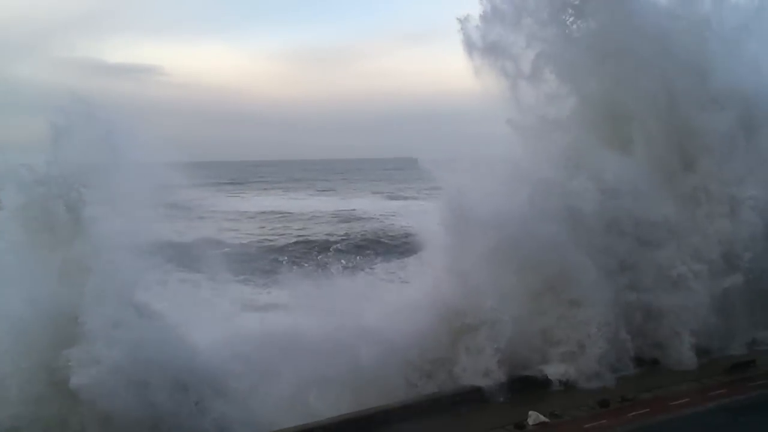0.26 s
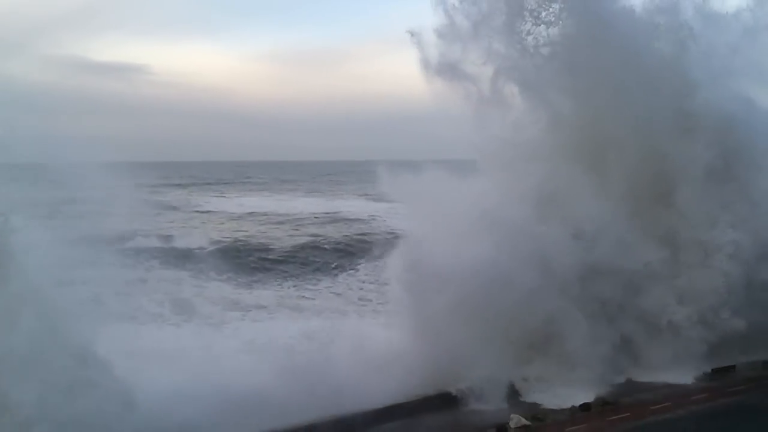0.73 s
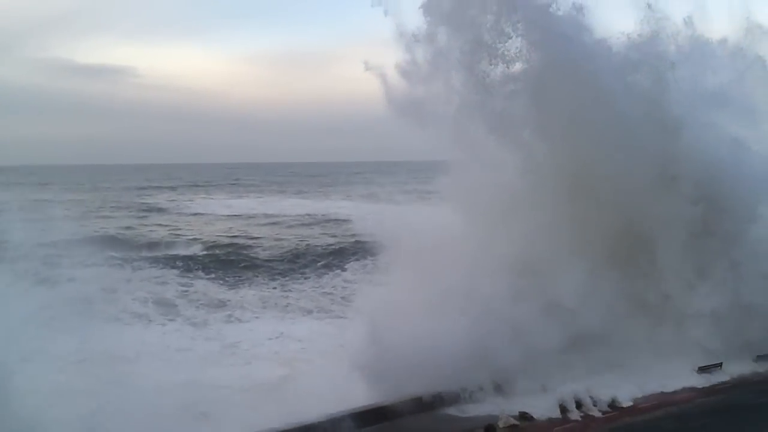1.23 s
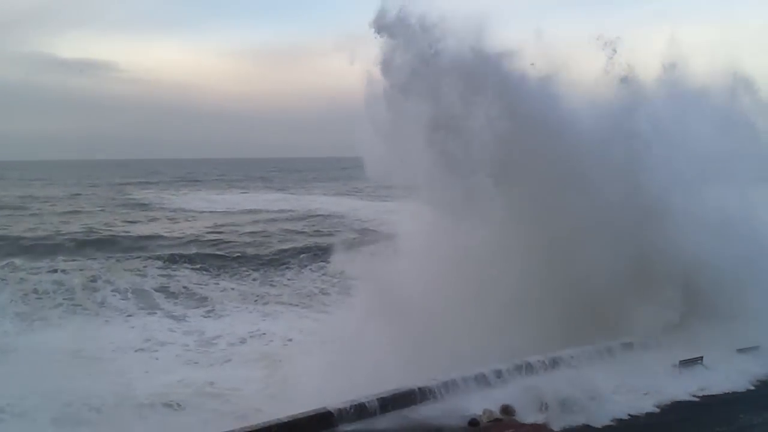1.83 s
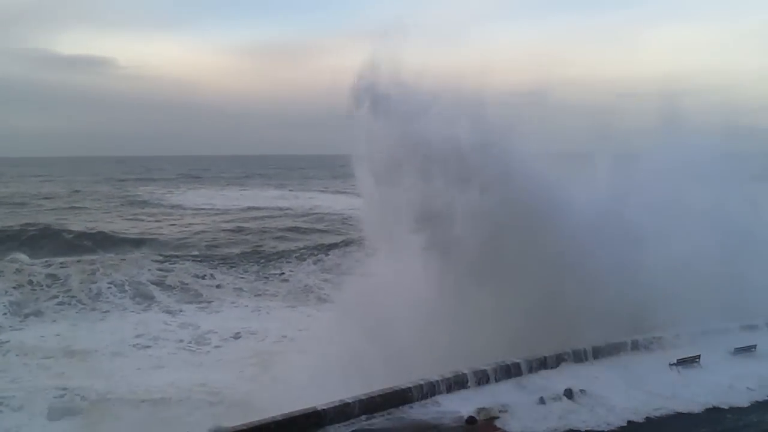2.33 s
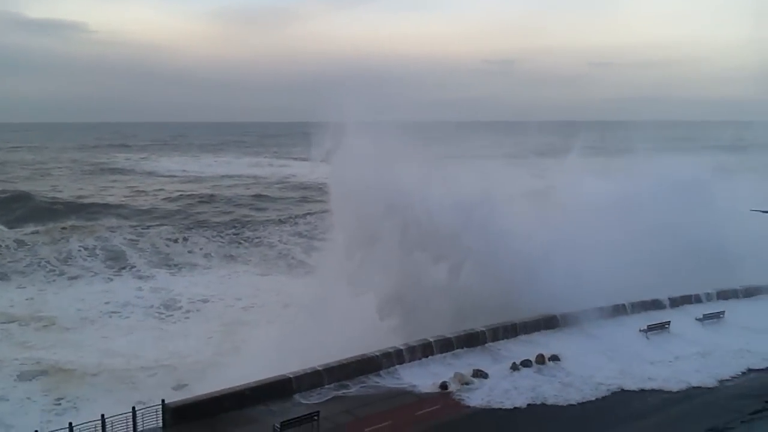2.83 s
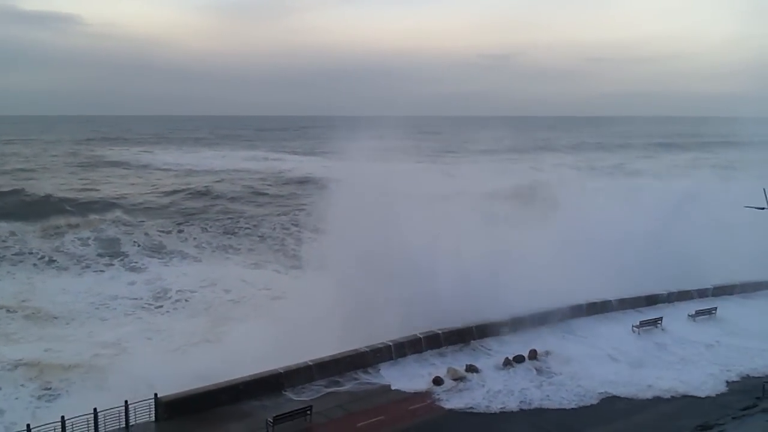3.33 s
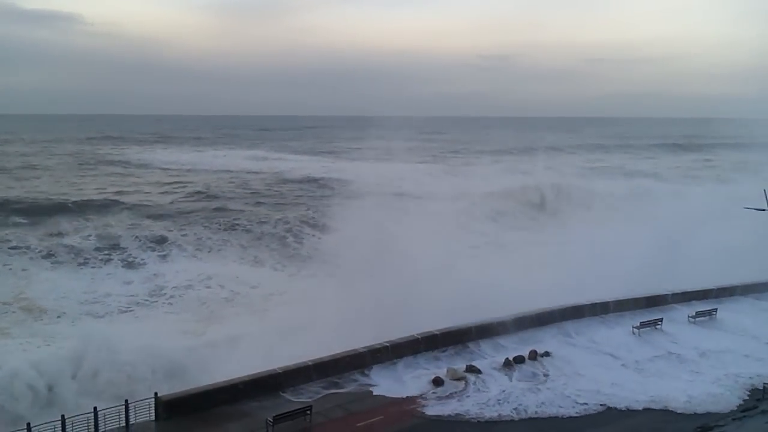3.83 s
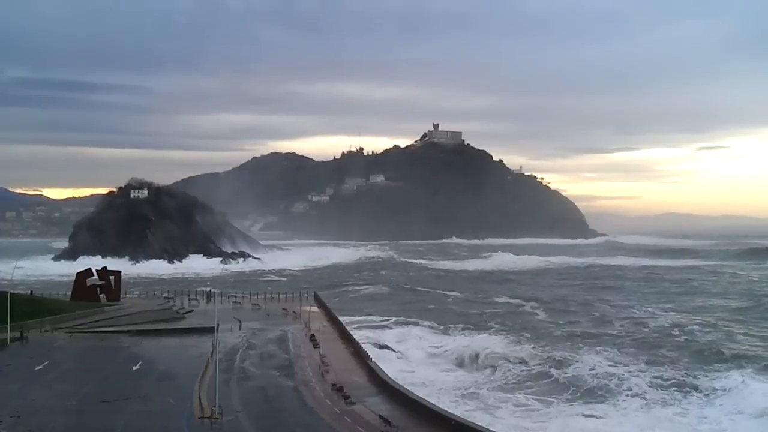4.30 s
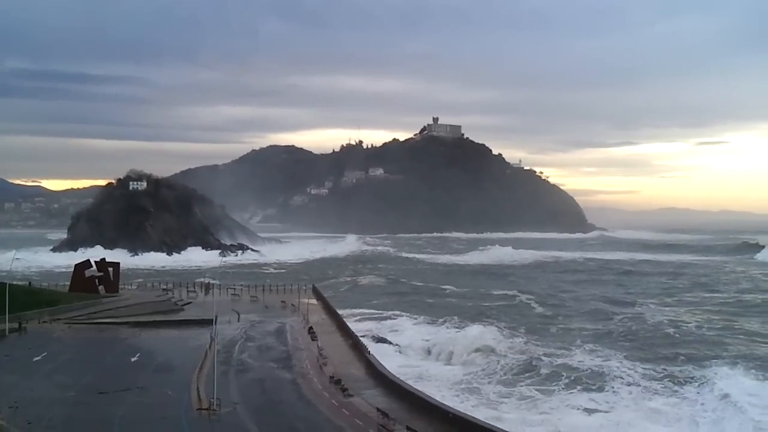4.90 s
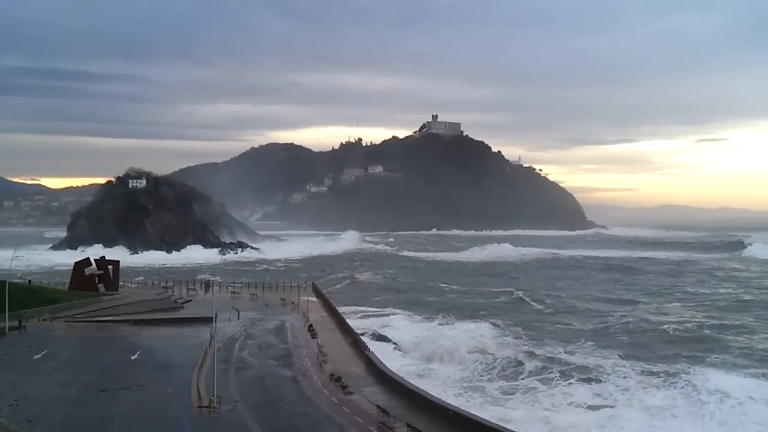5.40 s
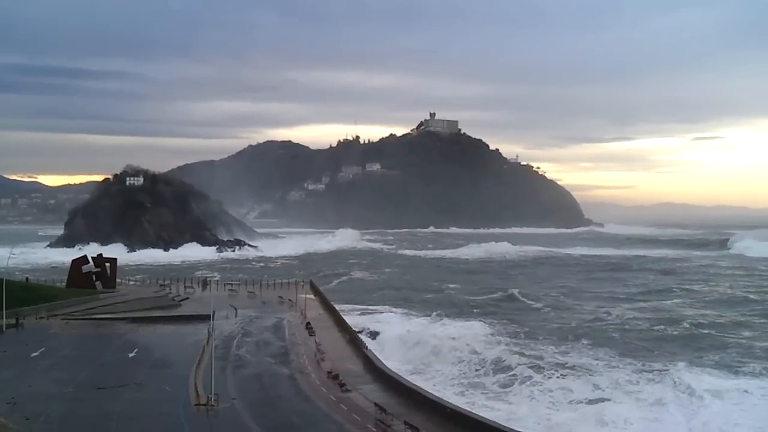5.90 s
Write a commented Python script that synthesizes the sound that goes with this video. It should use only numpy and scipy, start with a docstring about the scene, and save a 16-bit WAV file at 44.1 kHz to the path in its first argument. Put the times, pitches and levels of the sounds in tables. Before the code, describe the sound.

A storm wave booms and bursts on a concrete sea wall, hissing spray rains down and fades, then brief silence and a duller steady surf roar.

```python
"""Water booms and bursts on a concrete sea wall in a storm, spray rains back and foam washes over the promenade.
After a short silence the surf is heard from further along the front, duller and steadier.
Water is random drop impacts coloured by a spectrum, its boom and the wind are lumpy low noise, and
low thumps are short shoves of pressure or ragged rumbles.
One small microphone stands in the wind at both places; both channels carry the same signal."""
import sys
import numpy as np
from scipy import signal
from scipy.fft import rfft, irfft, next_fast_len
from scipy.io import wavfile
from scipy.ndimage import uniform_filter1d

SR = 44100
rng = np.random.default_rng(int(sys.argv[2]) if len(sys.argv) > 2 else 0)


def int16_out(signal):
    """Quantize to a 16-bit WAV file."""
    q = np.round(np.clip(np.atleast_2d(signal).T, -1, 1) * 32767)
    wavfile.write(sys.argv[1], SR, q.astype(np.int16))


N = 271215  # samples

# The silent break between the two places: its start and its end in seconds.
WALL_END_S, FRONT_START_S = (4.0043, 4.1715)
CUTOFF_HZ = 11250

# Spectra of the wind and of each kind of water. Each row: frequency in Hz, relative density in dB per Hz.
WALL_WIND = [(8, -2.5), (20, 7), (45, -4.5), (65, -5), (100, -10), (250, -34.5)]
FRONT_WIND = [(8, -2), (20, -1.5), (45, -7), (62, -6), (85, -7), (130, -12), (200, -17.5), (400, -45),
              (1000, -49)]
BOOM = [(35, -8.5), (55, 1.5), (85, 1), (135, -0.5), (190, -6), (260, -13), (500, -16.5)]
CHURN = [(130, -6), (190, -3.5), (250, 1), (320, -7), (400, 2), (530, -1), (700, -6), (900, -7.5),
         (1200, -12.5), (1700, -21.5), (3500, -48)]
SEA_CHURN = [(130, -6.5), (190, -3.5), (250, 1.5), (325, -3.5), (410, -2.5), (520, -1.5), (700, -5.5),
             (900, -6.5), (1200, -12), (1700, -20.5), (3500, -49)]
BACKWASH = [(140, -19), (195, 0.5), (250, -4), (325, -0.5), (400, -17), (700, -32.5)]
SPLATTER = [(700, -16.5), (1300, -3.5), (1800, 0), (2400, -2), (3000, -6), (4000, -1.5), (4700, -6.5),
            (5600, -7), (8000, -46)]
SPRAY = [(3000, -10.5), (4600, -7), (5300, -1), (6300, 0), (7800, 0), (8800, -2.5), (9700, -7.5),
         (10400, -10), (10900, -22), (11400, -63.5)]
TOP_HISS = [(4500, -19.5), (6500, 7.5), (8200, 7), (9200, -9), (10300, 8), (11000, -0.5), (11400, -37)]
WASH = [(700, -32), (1200, 0), (1550, 1.5), (1900, 1.5), (2400, -3), (3000, -5), (4000, -1), (4700, -3),
        (5600, -8.5), (8000, -44)]
SETTLED_SPRAY = [(3000, -20.5), (4600, -3), (5300, 0.5), (6300, 2.5), (8200, 3), (8700, -4.5), (9500, -2),
                 (10100, -7), (10600, -49)]
ROAR = [(110, -19), (190, -7.5), (255, 1), (370, -4.5), (490, -3), (720, -6.5), (1100, -7.5), (1400, -10.5),
        (1680, -5.5), (2000, -14.5), (2600, -25), (4000, -54)]
FOAM = [(1500, -17), (2200, -7), (3000, -10), (3950, -4.5), (4500, -6), (5200, -2.5), (5700, -12),
        (6500, -11.5), (7700, -13), (8600, -15.5), (9500, -16.5), (10100, -22), (10700, -37.5)]

# Wind at each place, and how fast it eases at the wall.
WALL_WIND_DB, WALL_WIND_EASES_DB_PER_S = -30, 0.6
FRONT_WIND_DB = -31.5
# Gusts. Each row: time of the peak in seconds, half length (Gaussian sigma) in seconds, dB above the steady wind.
GUSTS = [(0.18, 0.079, 1), (0.75, 0.21, 5), (1.38, 0.05, 2.5), (1.85, 0.085, 1), (5.056, 0.034, 0.5),
         (5.85, 0.13, 2)]

# Low thumps, as water lands or an eddy hits the microphone.
# Each row: time of the peak in seconds, centre in Hz, level at the peak in dB, half length (sigma) in seconds.
THUMPS = [(0.074, 46, -29.5, .025), (0.085, 83, -30, 0.028), (0.24, 19, -25.5, .06), (0.44, 31, -29, .025),
          (0.441, 120, -30.5, 0.0075), (0.538, 39, -29, .018), (0.545, 140, -26.5, 0.0082),
          (0.576, 15, -26, .04), (0.635, 60, -24, .013), (0.672, 105, -26, .009), (0.705, 36, -21.5, 0.026),
          (0.76, 123, -29.5, .01), (0.798, 100, -27, .01), (0.821, 35, -27, 0.026),
          (0.901, 56, -21.5, 0.018), (0.977, 88, -26.5, 0.015), (1.141, 48, -22.5, 0.027),
          (1.195, 79, -28, 0.015), (1.331, 96, -24, .009), (1.362, 40, -22, .03), (1.458, 75, -23.5, .013),
          (1.593, 66, -24.5, 0.021), (1.827, 85, -25.5, .014), (1.965, 80, -25.5, 0.019),
          (2.069, 40, -28, .028), (2.222, 68, -25, .012), (2.326, 49, -28, .016), (2.63, 43, -29, .02),
          (2.75, 44, -30, 0.018), (2.831, 61, -24.5, .013), (2.965, 59, -28.5, 0.017),
          (3.161, 61, -33, .02), (3.32, 73, -31, .02), (3.439, 71, -32.5, 0.02), (4.288, 113, -32.5, 0.017),
          (4.444, 44, -32, .016), (4.612, 28, -30, .018), (4.776, 49, -31, 0.027), (5.132, 22, -26.5, .018),
          (5.323, 70, -31.5, .011), (5.411, 20, -28, .024), (5.556, 73, -32, .012), (5.678, 69, -32, 0.014),
          (5.763, 41, -30.5, .03), (5.895, 34, -27, .024), (5.978, 76, -30, .012)]
# A thump whose half length spans this many cycles is wholly ragged noise, spread this far around its pitch.
THUMP_RAGGED_CYCLES, THUMP_WIDTH_OCTAVES = 2.5, 0.65

# Open surf: a steady roar, and foam that slowly dies down.
ROAR_DB, FOAM_DB, FOAM_FADE_DB_PER_S = -38, -44.5, 1.53

# The sea at the wall: steady boom and churn, and the churning that lingers between surges.
SEA_BOOM_DB, SEA_CHURN_DB, SPENT_CHURN_DB = -38, -37.5, -54
# The last wave still falls, the next hits the wall and comes down in three sheets, lesser ones run in after it.
# Each row: start in seconds, build-up in seconds, length in seconds, boom in dB, churn in dB, splatter in dB;
# the levels are those before the sag, the drain and each layer's trim.
SURGES = [(0.018, 0.045, 0.42, -44, -50, -36.5), (0.4, 0.032, 0.54, -35, -35.5, -39),
          (0.801, 0.08, 0.69, -31.5, -33.5, -31), (1.02, .05, 0.3, -35, -43, -35.5),
          (1.525, 0.041, 0.31, -37, -36.5, -32.5), (3.124, 0.06, 0.78, -46, -43.5, -38),
          (3.33, 0.059, 0.54, -49, -42.5, -56), (3.76, 0.066, 0.44, -53, -50, -38.5)]
# Every surge sags from its start, then drains away, the low voices last.
SURGE_SAG_DB_PER_S = 4
BOOM_DRAIN_DB_PER_S, CHURN_DRAIN_DB_PER_S, SPLATTER_DRAIN_DB_PER_S = 17.5, 14.5, 35.5
# The spent wave pours back off the wall, a hollow gurgle.
BACKWASH_S, BACKWASH_BUILD_S, BACKWASH_DB = 2.43, .3, -44.5

# How much spray is coming down. Each row: time in seconds, level in dB before each layer's trim.
SPRAY_FALL = [(0.0, -39), (0.29, -35), (0.8, -30.5), (1.11, -28), (1.5, -29), (1.78, -28.5), (1.98, -30.5),
              (2.05, -32.5), (3.12, -40), (3.51, -38.5), (4.0, -41)]
# Splatter and the spray's bright top hiss: level before trim at the usual spray, and the share of the
# spray's dB swing each follows.
SPRAY_USUAL_DB = -34
SPLATTER_DB, SPLATTER_FOLLOWS = -37, 0.46
TOP_HISS_DB, TOP_HISS_FOLLOWS = -58, 2.7
# The spray settles and the next surge runs in. Each row: time in seconds, power share of wash from 0 to 1.
SETTLING = [(0, 0.37), (1, 0.02), (2.7, 0.18), (3.3, 0.72), (4.0, 1)]

# Resonances of the microphone port, facing the wave. Each row: centre in Hz, width in Hz, gain in dB.
PORT = [(2070, 570, 7), (3840, 640, 1.3), (5570, 690, 5), (6240, 200, -2)]
# A narrow band of the hiss rises and hollows as the microphone turns. Each row: time in seconds, gain in dB.
TURNING = [(0, -1), (.8, 1.5), (1.4, 2.5), (1.9, 0.5), (2.35, -5), (3.0, -4.5), (3.3, 0.5), (4.0, -6)]


def from_db(db):
    """Amplitude of a level in dB."""
    return 10 ** (np.asarray(db) / 20)


def rms_one(x):
    """Scale x to an rms of 1."""
    return x / np.sqrt(np.mean(x ** 2) + 1e-20)


def in_time(rows):
    """A curve of (seconds, value) rows, read at every sample."""
    s, values = np.transpose(rows)
    return np.interp(np.arange(N) / SR, s, values)


def swell(s, half_s):
    """A smooth Gaussian rise and fall of height 1."""
    return np.exp(-.5 * ((np.arange(N) / SR - s) / half_s) ** 2)


def drift(rate_hz):
    """Slow chance with a spread of 1: noise through two equal low-pass poles, drawn every 40 samples."""
    r = np.exp(-2 * np.pi * rate_hz * 40 / SR)
    noise = rng.standard_normal(N // 40 + 2002)
    slow = signal.lfilter([1], [1, -2 * r, r * r], noise)[2000:]  # drop the filter's start
    return np.interp(np.arange(N) / 40, np.arange(len(slow)), rms_one(slow))


def coloured(x, spectrum):
    """Give x a spectrum that falls away beyond its ends; rms 1."""
    size = next_fast_len(N)
    hz = np.maximum(np.fft.rfftfreq(size, 1 / SR), 1)
    points, db = np.transpose(spectrum)
    gain = from_db(np.interp(np.log(hz), np.log(points), db))
    skirts = np.minimum(hz / points[0], 1) ** 2 * np.minimum(points[-1] / hz, 1) ** 2
    return rms_one(irfft(rfft(x, size) * gain * skirts, size)[:N])


def turbulence(spectrum, eddy_s):
    """Lumpy low pressure noise whose strength holds over spans longer than an eddy."""
    x = coloured(rng.standard_normal(N), spectrum)
    power = uniform_filter1d(x ** 2, max(int(eddy_s * SR), 2))
    return x / np.sqrt(power + 1e-6)


def water(level_db, spectrum, per_s, spread_db, surge_db, surge_hz):
    """Countless drops and bursting bubbles of uneven size merge into a rush; water falls in clumps."""
    impacts = np.sqrt(rng.poisson(per_s / SR, N)) * rng.standard_normal(N)
    sizes = from_db(spread_db * rng.standard_normal(N))
    level = from_db(level_db + surge_db * drift(surge_hz))
    return level * coloured(impacts * sizes, spectrum)


def lift(x, hz, width_hz, db):
    """A resonance raises or lowers one band."""
    r = np.exp(-np.pi * width_hz / SR)
    zeros = np.array([1, 0, -1]) * (1 - r * r) / 2
    poles = [1, -2 * r * np.cos(2 * np.pi * hz / SR), r * r]
    return x + (from_db(db) - 1) * signal.lfilter(zeros, poles, x)


def port(x):
    """The cavity in front of the microphone colours a few broad bands; one band depends on where it points."""
    for hz, width_hz, db in PORT:
        x = lift(x, hz, width_hz, db)
    return lift(x, hz=4500, width_hz=350, db=in_time(TURNING))


def wind(steady_db, spectrum, eddy_s):
    """Eddies press on the microphone, harder with every gust."""
    gust_db = sum(db * swell(s, half_s) for s, half_s, db in GUSTS)
    return from_db(steady_db + gust_db) * turbulence(spectrum, eddy_s)


def thumps():
    """Each thump swells and dies at once: a short one is a shove of pressure, a longer one a ragged rumble."""
    out = np.zeros(N + SR)
    hz = np.maximum(np.fft.rfftfreq(SR, 1 / SR), 1)
    t = np.arange(SR) / SR - .5  # each is built in one second, peaking in the middle
    for s, centre_hz, db, half_s in THUMPS:
        shape = np.exp(-.5 * (t / half_s) ** 2)
        ragged = np.clip(half_s * centre_hz / THUMP_RAGGED_CYCLES, 0, 1)
        band = np.exp(-.5 * (np.log2(hz / centre_hz) / THUMP_WIDTH_OCTAVES) ** 2)
        rumble = rms_one(irfft(rfft(rng.standard_normal(SR)) * band, SR))
        shove = np.sqrt(2) * np.sin(2 * np.pi * (centre_hz * t + rng.random()))
        burst = shape * (np.sqrt(1 - ragged) * shove + np.sqrt(ragged) * rumble)
        same_energy = np.sqrt(np.sum(shape ** 2) / np.sum(burst ** 2))
        start = int(s * SR)
        out[start:start + SR] += from_db(db) * burst * same_energy
    return out[SR // 2:SR // 2 + N]


def open_surf():
    """Distant breakers merge into a smooth roar under a thin hiss of foam."""
    age = np.maximum(np.arange(N) / SR - FRONT_START_S, 0)
    foam_db = FOAM_DB - FOAM_FADE_DB_PER_S * age
    roar = water(ROAR_DB, ROAR, per_s=50000, spread_db=0.3, surge_db=0.6, surge_hz=21)
    foam = water(foam_db, FOAM, per_s=140000, spread_db=0.8, surge_db=0.6, surge_hz=14)
    return roar + foam


def backwash():
    """The spent wave pours back off the wall and gurgles, growing to a steady level."""
    build = np.clip((np.arange(N) / SR - BACKWASH_S) / BACKWASH_BUILD_S, 0, 1)
    return build * water(BACKWASH_DB, BACKWASH, per_s=4000, spread_db=0.0, surge_db=2.0, surge_hz=11)


def surging(bed_db, voice, drain_db_per_s):
    """Level in dB of one voice (0 boom, 1 churn, 2 splatter): the powers of its bed and every surge add."""
    t = np.arange(N) / SR
    power = from_db(bed_db) ** 2
    for s, build_s, length_s, *levels_db in SURGES:
        age = np.maximum(t - s, 0)
        loss_db = SURGE_SAG_DB_PER_S * age + drain_db_per_s * np.maximum(age - length_s, 0)
        build = 1 - np.exp(-age / build_s)
        power = power + (build * from_db(levels_db[voice] - loss_db)) ** 2
    return 10 * np.log10(power)


def water_mass():
    """The mass of water booms as lumpy low noise and churns with every surge, over a steadily churning sea."""
    boom_db = surging(SEA_BOOM_DB, 0, BOOM_DRAIN_DB_PER_S)
    churn_db = surging(SPENT_CHURN_DB, 1, CHURN_DRAIN_DB_PER_S)
    boom = from_db(boom_db) * turbulence(BOOM, eddy_s=0.06)
    churn = water(churn_db + .3, CHURN, per_s=25000, spread_db=1.0, surge_db=0.3, surge_hz=24)
    sea = water(SEA_CHURN_DB, SEA_CHURN, per_s=30000, spread_db=0.6, surge_db=0.17, surge_hz=18)
    return boom + churn + sea


def spray_and_wash():
    """Drops splatter on concrete under hissing spray, crossing in power with wash and its fizz."""
    spray_db = in_time(SPRAY_FALL)
    swing_db = spray_db - SPRAY_USUAL_DB
    splatter_db = surging(SPLATTER_DB + SPLATTER_FOLLOWS * swing_db, 2, SPLATTER_DRAIN_DB_PER_S)
    top_hiss_db = TOP_HISS_DB + TOP_HISS_FOLLOWS * swing_db  # steep: brightest when the spray is loudest
    splatter = water(splatter_db - 4.0, SPLATTER, per_s=80000, spread_db=1.5, surge_db=0.92, surge_hz=15)
    spray = water(spray_db - 0.87, SPRAY, per_s=120000, spread_db=0.5, surge_db=0.52, surge_hz=20)
    top_hiss = water(top_hiss_db, TOP_HISS, per_s=150000, spread_db=0.3, surge_db=1.5, surge_hz=15)
    wash = water(splatter_db - 2.5, WASH, per_s=90000, spread_db=0.0, surge_db=0.54, surge_hz=31)
    fizz = water(spray_db - 0.4, SETTLED_SPRAY, per_s=130000, spread_db=2.0, surge_db=0.44, surge_hz=28)
    settled = in_time(SETTLING)
    return np.sqrt(1 - settled) * (splatter + spray + top_hiss) + np.sqrt(settled) * (wash + fizz)


def breaking_wave():
    """The wave at the wall: its mass, backwash, spray and wash all reach the microphone through its port."""
    return port(water_mass() + backwash() + spray_and_wash())


def scene():
    """First at the wall, then a moment of silence, then further along; both channels alike."""
    t = np.arange(N) / SR
    wall_wind_db = WALL_WIND_DB - WALL_WIND_EASES_DB_PER_S * t
    low_thumps = thumps()
    at_wall = wind(wall_wind_db, WALL_WIND, eddy_s=0.085) + low_thumps + breaking_wave()
    along_front = wind(FRONT_WIND_DB, FRONT_WIND, eddy_s=0.092) + low_thumps + open_surf()
    mono = at_wall * (t < WALL_END_S) + along_front * (t > FRONT_START_S)
    return np.array([mono, mono])


def record(dry):
    """A steep elliptic low-pass cuts the top."""
    top_cut = signal.ellip(10, .1, 80, CUTOFF_HZ, fs=SR, output="sos")  # order, ripple dB, stop-band dB
    return signal.sosfilt(top_cut, dry)


dry = scene()
out = record(dry)
int16_out(out)
```